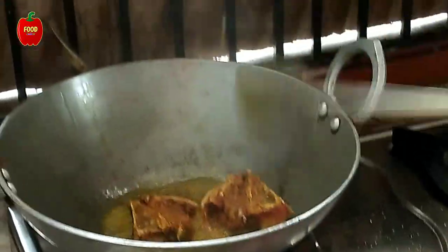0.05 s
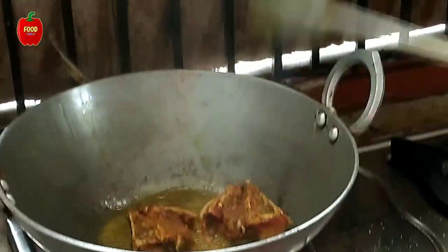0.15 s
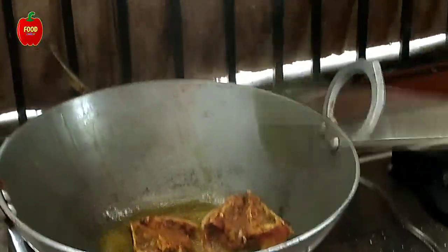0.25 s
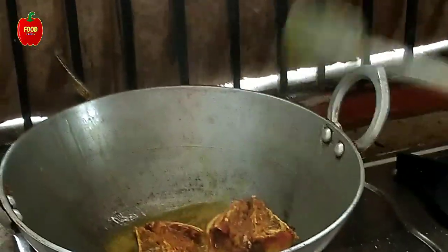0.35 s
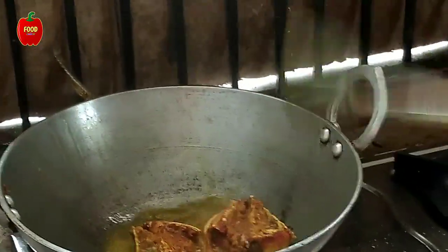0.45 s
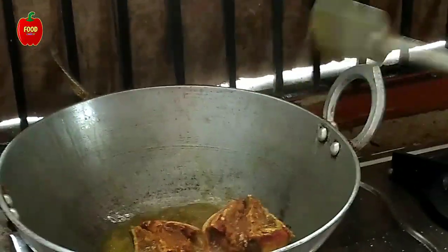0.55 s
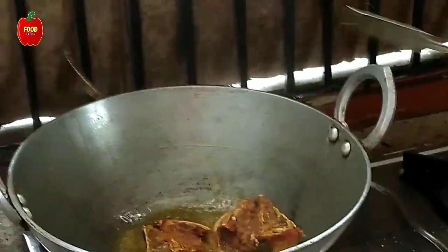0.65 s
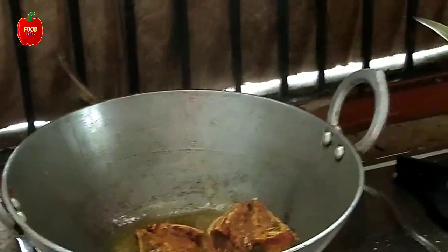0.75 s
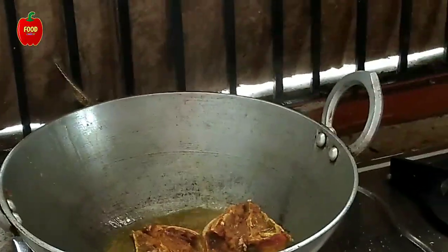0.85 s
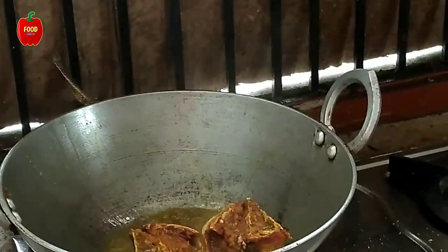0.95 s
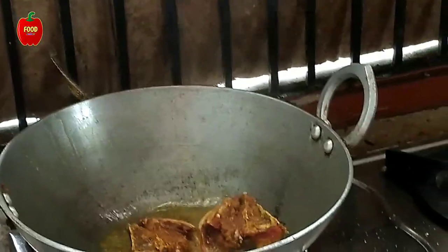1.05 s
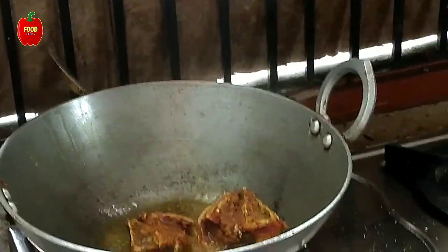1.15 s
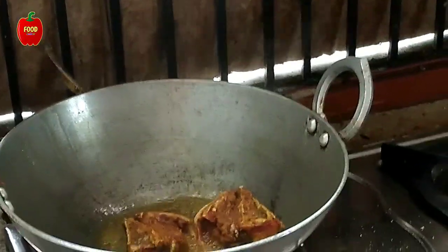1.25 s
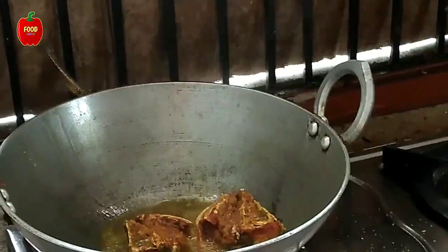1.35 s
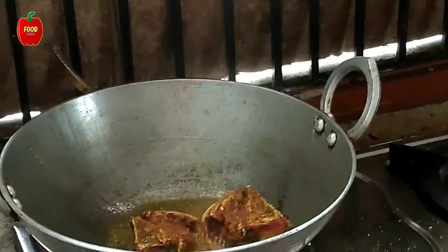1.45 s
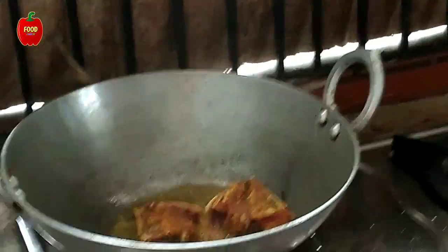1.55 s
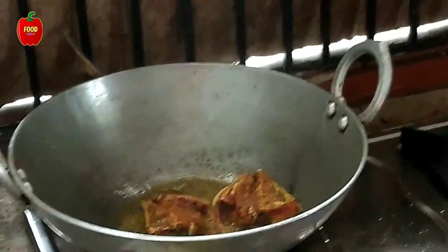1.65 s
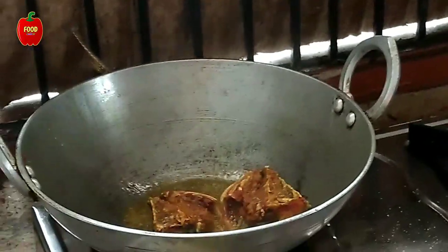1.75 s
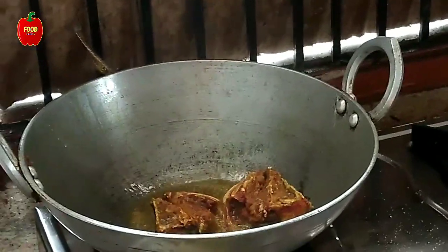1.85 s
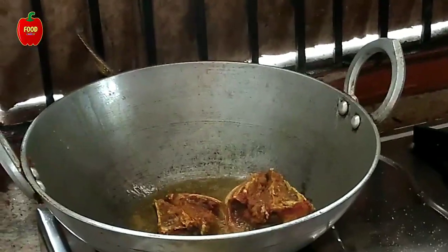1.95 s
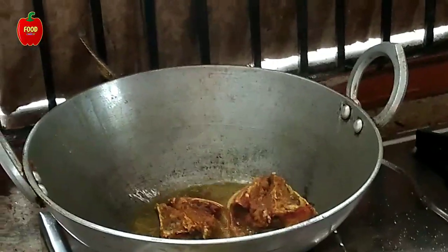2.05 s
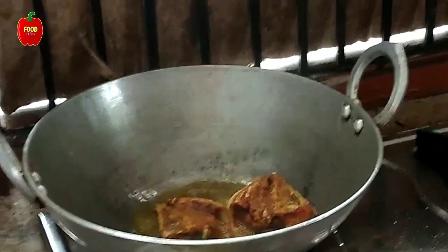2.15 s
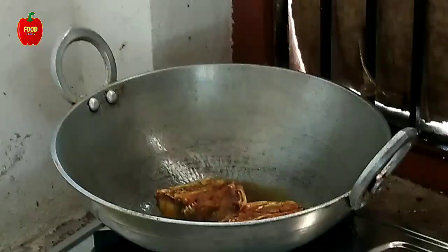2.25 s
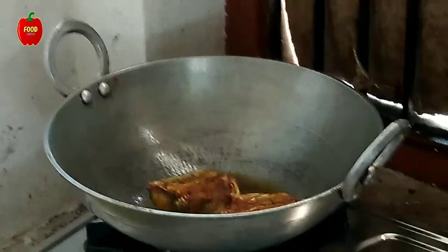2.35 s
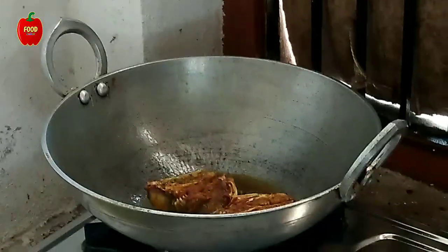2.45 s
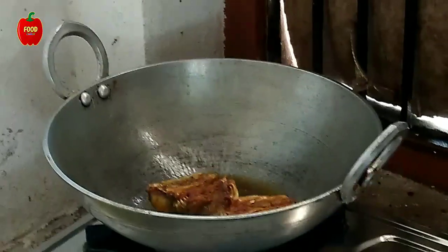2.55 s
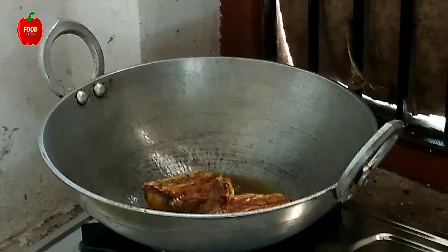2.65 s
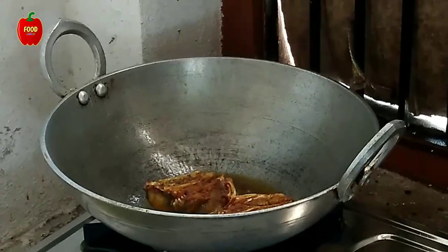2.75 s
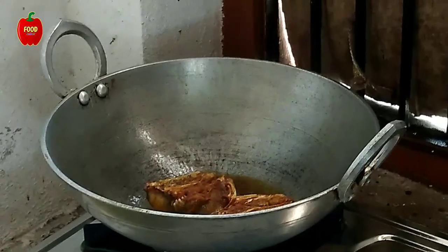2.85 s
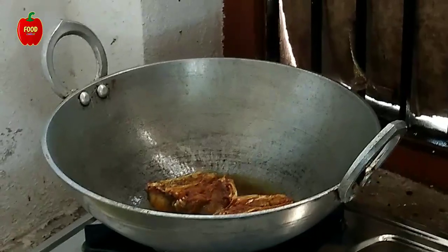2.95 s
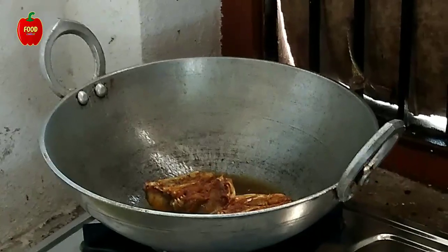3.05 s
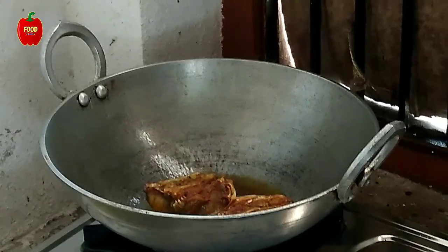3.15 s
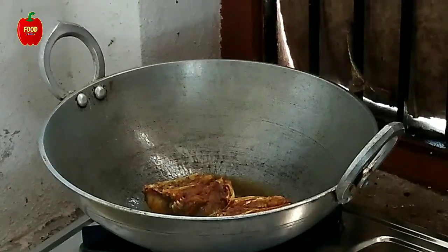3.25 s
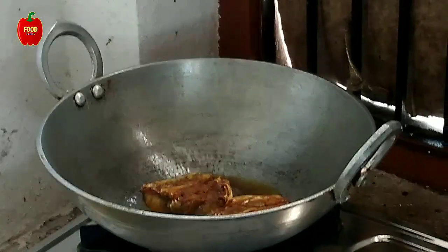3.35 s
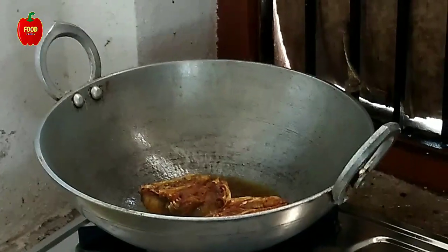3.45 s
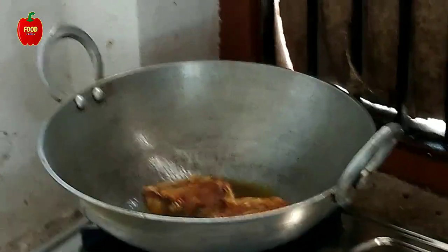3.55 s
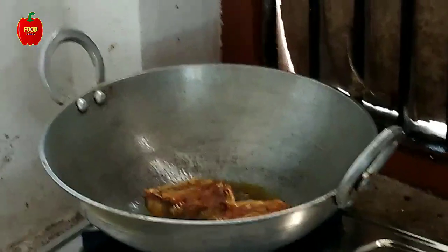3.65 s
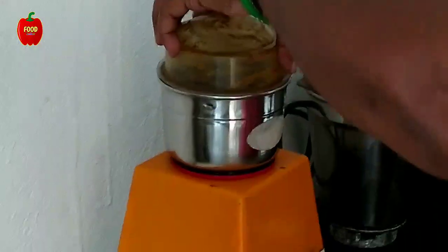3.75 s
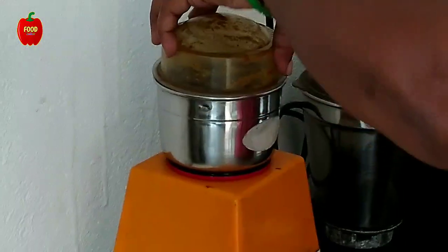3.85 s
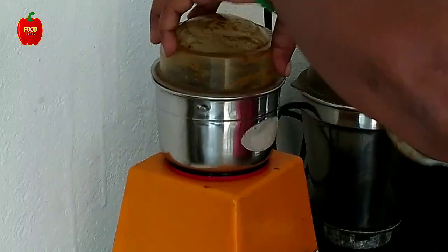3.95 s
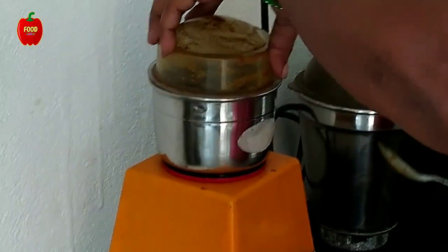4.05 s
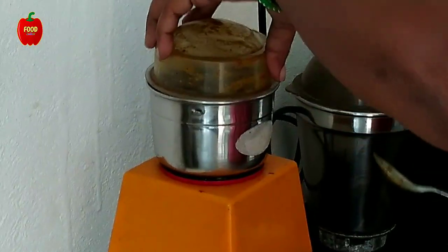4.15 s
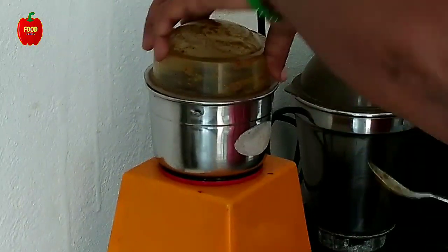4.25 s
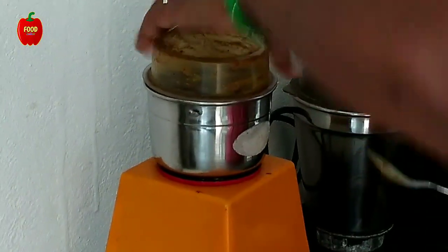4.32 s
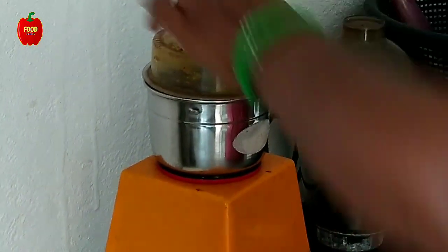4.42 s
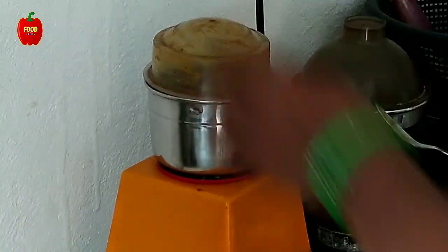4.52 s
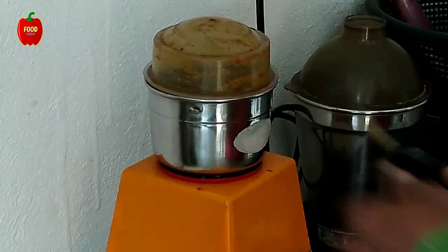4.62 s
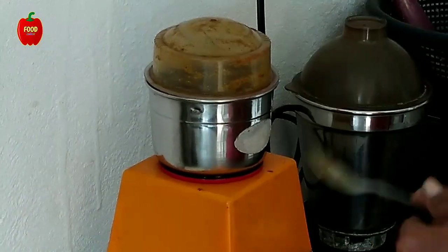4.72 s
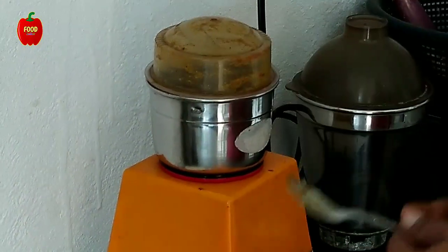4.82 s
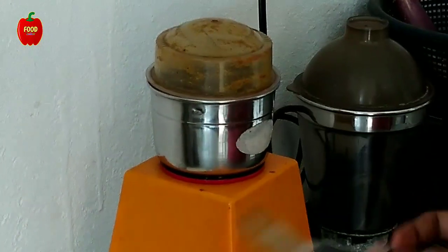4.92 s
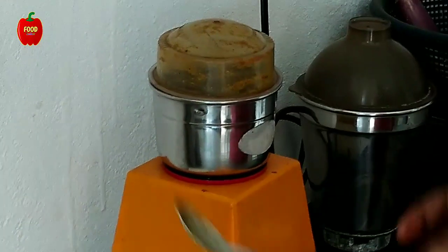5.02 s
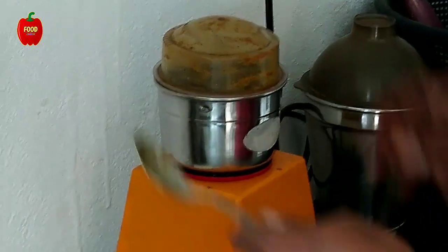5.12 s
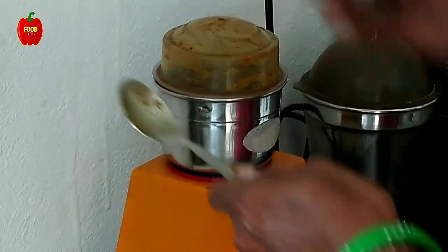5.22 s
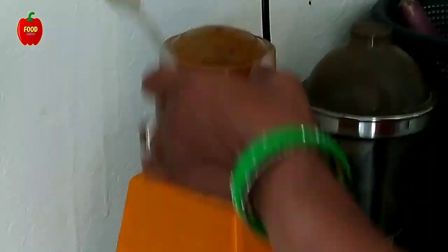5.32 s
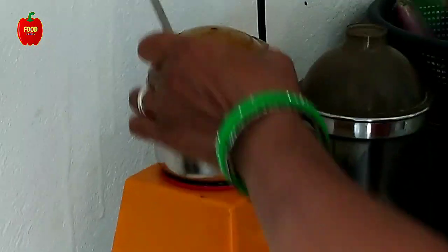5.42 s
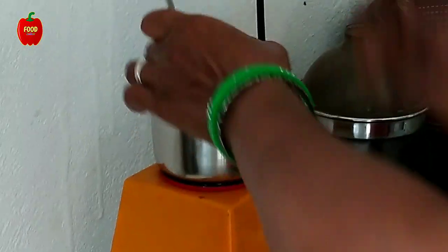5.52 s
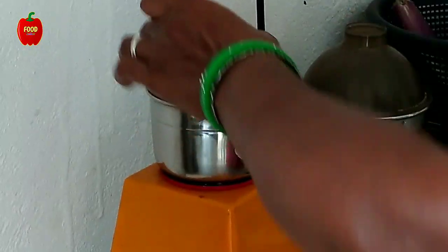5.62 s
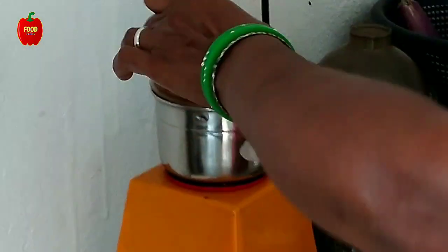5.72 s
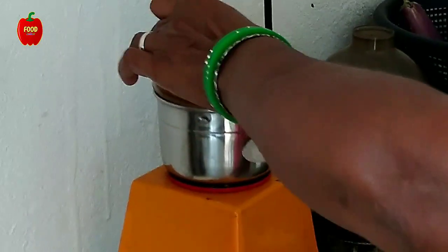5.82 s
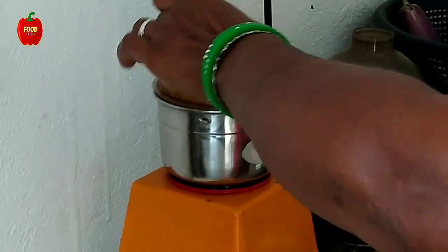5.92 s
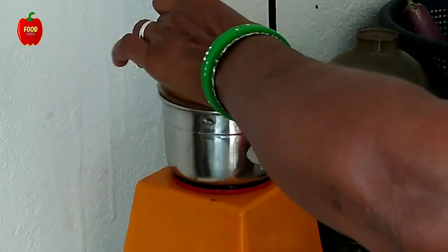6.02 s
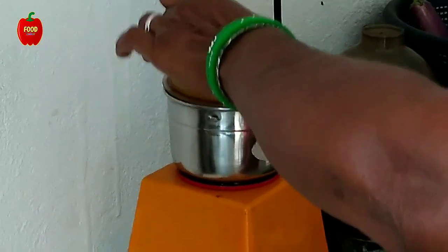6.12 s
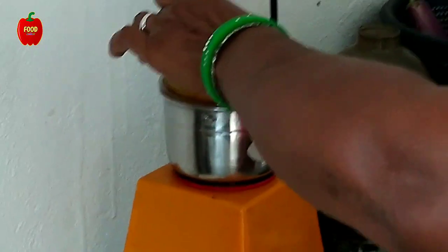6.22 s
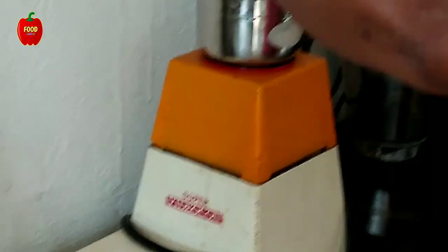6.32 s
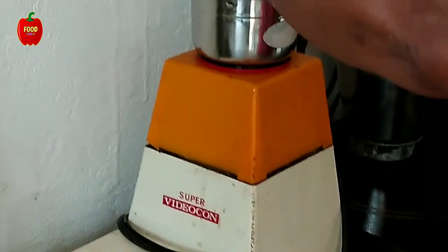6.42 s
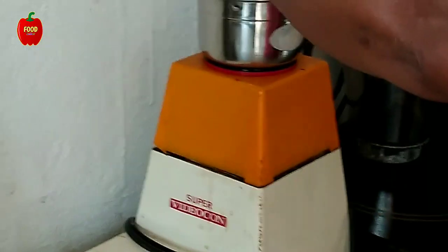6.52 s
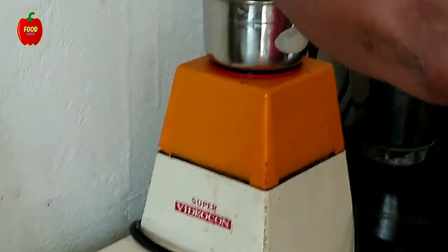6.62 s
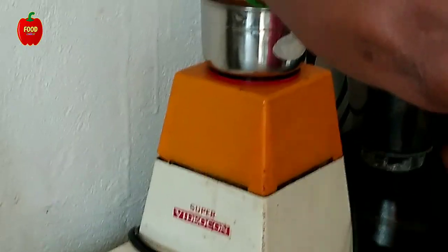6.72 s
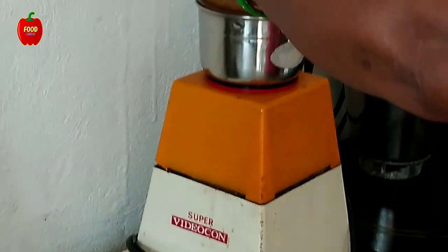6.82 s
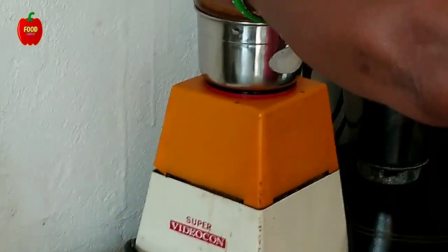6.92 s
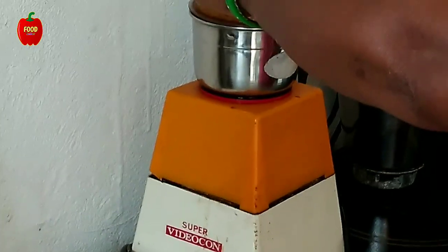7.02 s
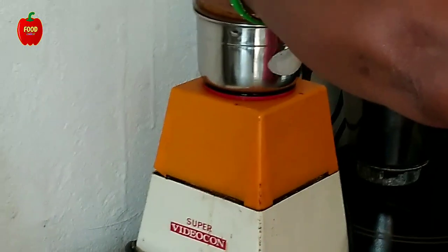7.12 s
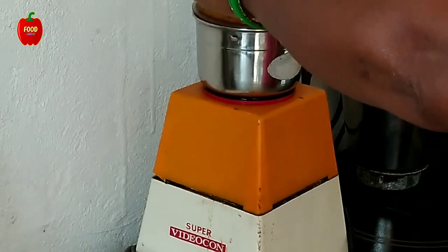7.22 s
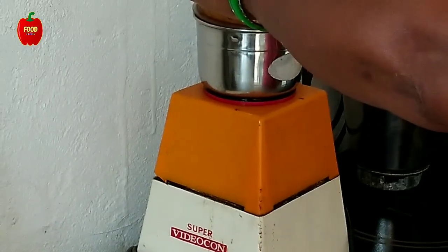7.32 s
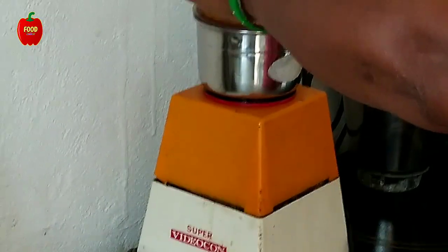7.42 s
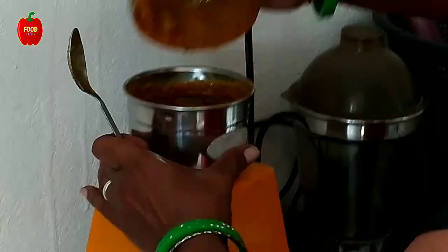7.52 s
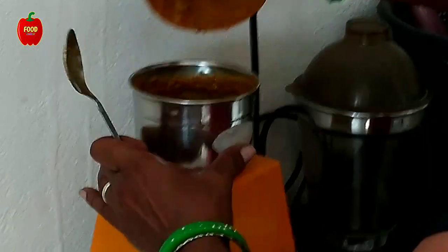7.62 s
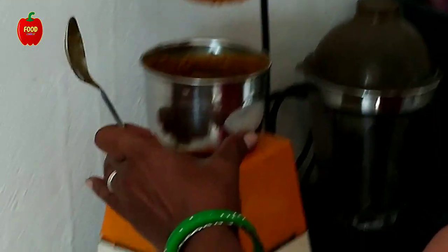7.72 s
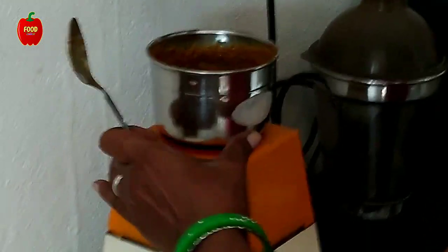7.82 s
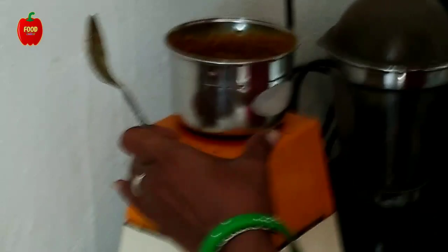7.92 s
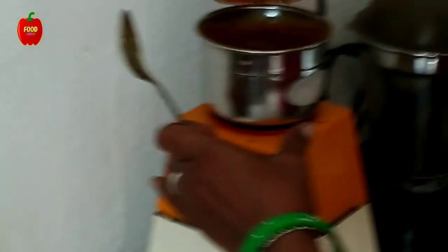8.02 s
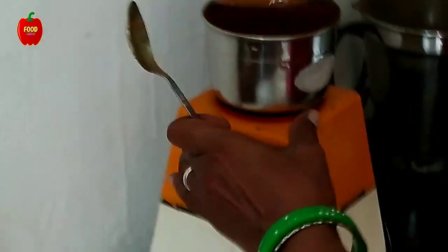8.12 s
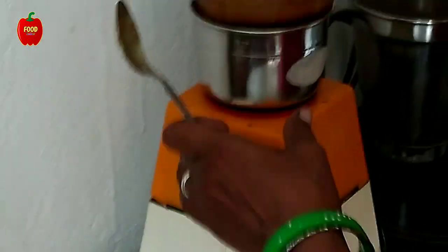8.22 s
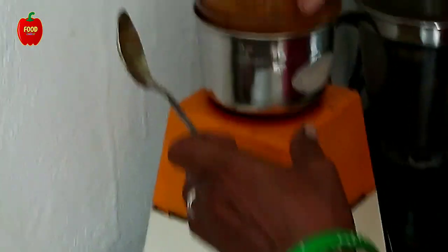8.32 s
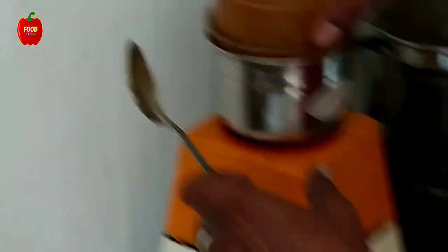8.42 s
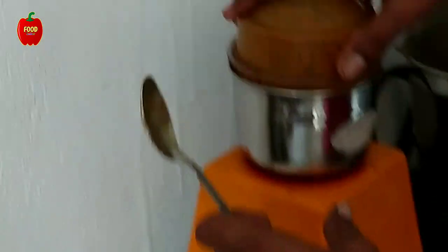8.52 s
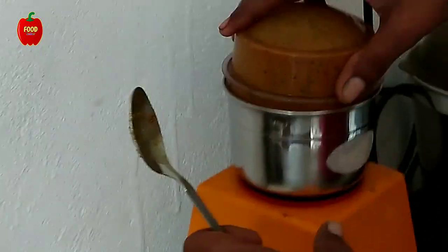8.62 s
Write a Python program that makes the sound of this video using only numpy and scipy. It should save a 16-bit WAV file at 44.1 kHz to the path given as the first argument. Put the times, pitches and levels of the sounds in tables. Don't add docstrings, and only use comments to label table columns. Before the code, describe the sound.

In a small kitchen, close stereo frying opens with dense bright sizzling, spitting oil and a strong spatula knock at 0.2 seconds, followed by lighter taps and short scrapes. More metal knocks cluster around 1.3 to 1.5, and sharp spits around 1.9. At 2.1 the microphone shifts beside the pan; the sizzle is somewhat quieter, with scattered taps, pops and scrapes until 3.5. It then jumps to a grinder, leaving soft distant frying, a faint low hum and small handling clicks. Around 5.15 the grinder starts abruptly: a high whine climbs over loud harsh hammering and jar rattle, with catches growing denser near 6. Switched off just before 6.1, the whine vanishes and clattering throbs slow and weaken, fading by 7.3. Faint frying continues to 8.5, with light bumps and thin utensil scrapes near 8 and after 8.2.

```python
import sys
import numpy as np
from scipy import signal
from scipy.fft import rfft, irfft, next_fast_len
from scipy.io import wavfile
from scipy.ndimage import uniform_filter1d

SR = 44100
rng = np.random.default_rng(int(sys.argv[2]) if len(sys.argv) > 2 else 0)


def amplitude_ratio(level_db):
    exponent = np.asarray(level_db, float) / 20
    return 10 ** exponent


def generate_wav(signal):
    frames = np.transpose(np.atleast_2d(signal))
    scaled = np.clip(frames, -1, 1) * 32767
    pcm = np.round(scaled).astype(np.int16)
    wavfile.write(sys.argv[1], SR, pcm)


N = 382347

CHANGES_S = [
    2.125,
    3.56,
    6.09,
]
PLACES = [0, 1, 2, 2]

# time in seconds, level in dB.
FRY_S_DB = [(0, -23), (.06, -21.5), (.9, -23), (1.62, -24.5), (1.8, -26), (1.97, -23.5), (2.12, -27),
            (2.16, -28.5), (2.5, -29.5), (2.62, -28), (3.54, -26.5), (3.575, -37), (4.2, -34.5), (4.5, -34),
            (5.1, -36), (7.4, -36.5), (7.55, -37), (8.2, -35.5), (8.5, -35.5)]
# frequency in Hz, density in dB per Hz.
FRY_COLOUR_HZ_DB = [
    [(24, -69), (40, -60), (85, -33), (130, -21.5), (188, -26), (217, -23), (271, -29), (382, -29.5),
     (625, -16.5), (779, -19.5), (1630, -16), (2660, -6.5), (4240, -6.5), (5030, -14), (8630, -1),
     (14100, -17)],
    [(24, -75), (40, -20), (118, -27), (192, -17.5), (422, -22.5), (465, -14.5), (513, -21), (595, -11),
     (1440, -13), (2530, -1.5), (3230, -5), (4560, -3.5), (5030, -10.5), (8020, 0), (14100, -14)],
    [(24, -68), (40, -48), (86, -8.5), (136, -11.5), (179, -8), (364, -13), (422, -15.5), (1150, -11.5),
     (2180, -3), (2660, -8.5), (4450, -8), (5970, -11), (7270, -7), (9760, -4), (14100, -15)],
]
# frequency in Hz, left minus right in dB.
FRY_BALANCE_HZ_DB = [
    [(60, 9.0), (110, 13), (200, 18), (380, 6.5), (690, 0), (1270, -0.5), (2350, 1), (4330, -2.5),
     (7980, -2), (14700, 9)],
    [(60, 13), (110, 9.5), (200, 17), (380, 7), (690, 0.5), (1270, -0.5), (2350, -1), (4330, -3.5),
     (7980, -2), (14700, 17)],
    [(60, 13), (110, 13), (200, 20), (380, 9.5), (690, -0.5), (1270, 3), (2350, 11.5), (4330, 0),
     (7980, 6.5), (14700, 15)],
]
# frequency in Hz, left-right correlation (-1 to 1).
FRY_ALIKE_HZ = [(60, 0.86), (180, 0.48), (540, 0.89), (1630, 0.03), (4890, 0.025), (14700, 0.03)]
# centre in Hz, width in Hz, gain in dB.
FRY_PEAKS_HZ_DB = [
    [(620, 60, 5.5), (11150, 1900, -3)],
    [(630, 150, 2.5), (10200, 1000, -2.5)],
    [(2300, 510, 0.5), (4470, 270, 2), (7320, 750, 6.5), (8200, 800, -1.5), (9040, 990, 4),
     (10100, 600, 3.5), (11400, 700, -3.5), (1500, 890, -9), (290, 94, -4.5)],
    [(2120, 220, 4.5), (2400, 200, 3), (4560, 400, 2), (5700, 500, 1), (7780, 700, 4), (8850, 900, 2.5),
     (9850, 600, -3), (11800, 900, -2.5), (1500, 1450, -9), (180, 27, -11.5)],
]
PAN_DRONE_DB = [-44.5, -47.5, -57.5, -54.5]
# time in seconds, peak in dB.
SPITS_S_DB = [(0.034, -17.5), (0.7607, -29), (1.906, -14), (1.952, -18), (2.54, -27), (2.808, -25),
              (2.921, -14.5), (3.928, -35), (4.161, -28), (4.473, -30)]
# time in seconds, level in dB, t60 in seconds.
RUSTLES_S_DB = [
    (3.56, -54.5, 7.7),
    (7.3, -69, 8.9),
]
DRONE_SHARE = .3
SHAKEN_OIL_DB, SHAKEN_OIL_T60_S = -23, .4

# time in seconds, peak in dB, left minus right in dB.
KNOCKS_S_DB = [(0.205, -9.5, 15), (0.226, -17.5, 3), (0.247, -17.5, 3), (0.265, -21, 6),
               (0.311, -21.5, -1.5), (0.391, -22.5, 2), (0.629, -22, 3), (0.69, -27, 3), (0.925, -28.5, 10),
               (1.318, -16, 3), (1.353, -18, 5), (1.378, -26, 0), (1.425, -24, 3), (1.462, -25, 0),
               (1.934, -27.5, -1), (2.098, -30, -1), (2.741, -28, 3), (2.92, -27, 0.0), (2.948, -22.5, 3),
               (3.358, -26.5, 5)]
# frequency in Hz, level in dB, t60 in seconds.
PAN_MODES_HZ_DB_S = [(143, -16, 0.059), (289, -4.5, 0.015), (432, -10, 0.11), (551, -5, 0.12),
                     (611, -8, 0.16), (653, -5, 0.11), (760, -0.5, 0.036), (930, -1.5, 0.02),
                     (1160, -12, 0.018), (1490, 0, 0.014), (2060, -1, 0.0083)]
SOFT_LOSS_DB_PER_DB, SOFT_BELOW_HZ = 0.48, 480
# time in seconds, peak in dB,
# frequency in Hz, t60 in seconds.
BUMPS_S_DB_HZ = [(0.314, -28, 1500, .02), (.631, -28, 870, 0.018), (1.324, -39, 182, .2),
                 (1.33, -42, 345, 0.26), (1.349, -47, 141, .1), (2.744, -32, 730, 0.025),
                 (3.357, -32, 720, .02), (6.334, -25, 400, 0.056), (6.44, -23.5, 435, 0.093),
                 (1.36, -40, 415, .15), (1.428, -32, 1010, 0.018), (1.938, -33, 1200, .015),
                 (2.102, -31, 1300, .015), (6.222, -23, 905, .06), (6.45, -24, 820, 0.075),
                 (6.536, -25, 1380, .06), (6.545, -22, 960, .04), (6.682, -24, 806, 0.046),
                 (6.862, -29, 636, 0.054), (5.6, -24, 980, 0.12), (4.036, -30, 6470, .015),
                 (4.197, -30.5, 4430, 0.02), (5.14, -27.5, 3500, .03), (3.698, -61, 285, 0.082),
                 (3.88, -52, 358, 0.13), (4.229, -52, 620, 0.052), (5.158, -14.5, 455, 0.095),
                 (5.195, -16, 454.6, 0.22), (5.24, -17, 1274, 0.086), (5.28, -16.5, 987, 0.1),
                 (5.3, -16.5, 990, 0.094), (6.02, -38, 55, 0.044), (6.066, -30, 85, 0.018),
                 (6.097, -20, 350, 0.1), (6.66, -27, 560, .06), (7.128, -36.5, 225, 0.13),
                 (8.049, -44, 299, 0.068), (8.157, -43.5, 367, 0.08), (8.176, -43, 350, .06),
                 (5.283, -18, 810, 0.089), (5.7, -19.5, 926, 0.13), (6.232, -22, 345, .04),
                 (6.409, -19.5, 325, 0.078), (6.484, -29, 332, 0.048), (6.525, -21, 314, 0.082),
                 (6.755, -22, 1370, .03), (8.57, -43, 447, .05), (8.26, -48, 163, 0.078),
                 (8.55, -46, 288, 0.072), (8.578, -48, 231, 0.074)]
# start in seconds, length in seconds, level in dB, frequency in Hz, t60 in seconds.
SCRAPES_S_DB_HZ = [(0.39, .04, -36, 3190, .004), (0.38, 0.05, -33.5, 2400, 0.005),
                   (.385, .04, -36, 3100, .003), (2.08, .04, -32, 2700, 0.0035),
                   (3.19, 0.016, -34, 1900, 0.012), (3.395, 0.024, -33, 2600, 0.0055),
                   (1.7, 0.11, -32.5, 3100, 0.0054), (1.6, 0.06, -40, 3400, 0.0059),
                   (7.951, 0.054, -52, 2180, .02), (8.25, 0.053, -44, 2200, .025),
                   (8.24, 0.045, -50, 2420, .025), (8.455, 0.042, -44, 2100, 0.028),
                   (8.3, 0.038, -40.5, 3800, 0.0043), (3.2, 0.034, -34, 2650, .006),
                   (2.0, 0.075, -32.5, 3160, 0.0045), (8.435, .05, -43, 2470, 0.031),
                   (8.525, .03, -47, 2300, .025)]

OFF_S, STOP_S, MAINS_HZ = 6.075, 7.5, 49.7
# time in seconds, speed in turns per second.
SHAFT_S_HZ = [(5.17, 182), (5.25, 190), (5.3, 196.5), (5.36, 208), (5.43, 216.5), (5.51, 223.7),
              (5.63, 231.7), (5.85, 240.3), (6.07, 245)]
# frequency in Hz, level in dB.
SLOT_BODY_HZ_DB = [(2160, -41), (2215, -31), (2250, -17), (2290, -15.5), (2360, -27), (2500, -24),
                   (2560, -25), (2595, -17), (2630, -11.5), (2660, -14.5), (2700, -36), (2785, -18.5),
                   (2820, -28), (2850, -34), (2890, -26), (2920, -28), (2940, -53)]
# frequency in Hz, level in dB.
SHAKE_BODY_HZ_DB = [(180, -35), (189, -33), (196, -45), (222, -39), (232, -34.5), (238, -26), (246, -29.5)]
# multiple of twice the mains, level in dB, loss in dB per second.
SIDE_LINES_DB = [
    (1, -1.5, 8),
    (-1, -3, 3.5),
    (-2, -17, 4),
]
SHAFT_ORDERS = [2, 6, 8, 9, 10, 14]
# centre in Hz, width in Hz, gain in dB.
ORDER_PEAKS_HZ_DB = [(416, 32, 15), (456.3, 28, 18.5), (484.5, 11, 15), (1410, 70, 12), (1960, 55, 15),
                     (2100, 90, 7), (2260, 95, 15), (2430, 60, 11), (3282, 70, 17), (3390, 43, 14)]

# time in seconds, level in dB.
LOAD_S_DB = [(5.13, -66), (5.137, -25.5), (5.21, -21.5), (6.07, -21), (6.66, -24), (6.87, -28),
             (7.0, -35.5), (7.2, -44), (7.29, -50)]
# frequency in Hz, density in dB per Hz.
RUN_COLOUR_HZ_DB = [(29, -69), (50, -39), (112, -30), (170, -16), (240, -4.5), (530, -3.5), (611, -6),
                    (687, -7), (979, -3.5), (1100, -7), (2030, -3.5), (4650, -15.5), (4990, -22),
                    (7280, -15), (10400, -20), (14100, -27.5)]
# frequency in Hz, density in dB per Hz.
COAST_COLOUR_HZ_DB = [(29, -72), (50, -64), (140, -19), (215, -3), (338, -4.5), (687, -8.5), (810, -4),
                      (1080, -10.5), (1330, -8), (1680, -6), (1990, 2.5), (2770, -12), (4540, -23.5),
                      (4990, -29.5), (8390, -20.5), (14100, -34)]
# frequency in Hz, left minus right in dB.
RUN_BALANCE_HZ_DB = [(60, 8), (110, 5), (200, 15), (380, 7), (690, -6), (1270, -4.5), (2350, 6),
                     (4330, -3.5), (7980, -0.5), (14700, 7)]
# frequency in Hz, left minus right in dB.
COAST_BALANCE_HZ_DB = [(60, 13), (110, 18), (200, 21), (380, 11), (690, -1.5), (1270, 1.5), (2350, 14),
                       (4330, 0), (7980, 2.5), (14700, 27)]
# frequency in Hz, left-right correlation (-1 to 1).
GRINDER_ALIKE_HZ = [(60, 0.3), (150, 1), (380, 0.87), (940, 0.76), (2350, 0.0029), (5880, 0.07),
                    (14700, -0.092)]
# centre in Hz, width in Hz, gain in dB.
RUN_PEAKS_HZ_DB = [(297, 100, 0), (446, 36, 3.5), (620, 28, 9.5), (725, 90, 1.5), (970, 45, 3),
                   (1130, 150, -4), (1300, 32, 6.5), (2030, 480, 5.5), (2300, 120, 4)]
# centre in Hz, width in Hz, gain in dB.
COAST_PEAKS_HZ_DB = [(289, 22, 8.1), (348, 56, 5.5), (455, 10, 11), (820, 40, 1.6), (1374, 82, 4.1),
                     (2180, 340, 2.6), (2340, 220, 3.9)]
# level in dB relative to a load of -22 dB, share of the load swing, gain in dB per
RUN_BANDS_DB = [
    (2, 0.85, -4.5),
    (0, 1.34, 2),
    (-8, 0.76, 4.5),
]
# level in dB relative to a load of -22 dB, share of the load swing, gain in dB per
COAST_BANDS_DB = [
    (-1.5, 1.1, 3.5),
    (3, 0.97, -2),
    (-7, 0.55, -5.5),
]
# time in seconds, housing gain in dB, jar gain in dB.
SURGES_S_DB = [(5.165, -2, -1.5), (5.218, 0, 0), (5.262, -6, 5), (5.295, 2.5, 4), (5.325, -2.5, -6),
               (5.36, 2.5, 5.5), (5.738, 1.5, 0), (5.9, -1.5, -3), (6.05, 4, 1), (6.125, 4, 4.5),
               (6.234, 1, -2), (6.484, 4.5, 1), (7.135, 7, 3)]
# time in seconds, loss in dB, slackening in seconds.
SLACKS_S_DB = [(6.09, 1.5, .02), (6.15, 2, .012), (6.19, 5, 0.1), (6.258, 2.5, .015), (6.31, 6.5, 0.028),
               (6.419, 5, 0.053), (6.52, 7.5, 0.033), (6.622, 10, 0.033), (6.74, 7, 0.043),
               (6.852, 13, 0.054), (6.897, 1.5, 0.011), (7.045, -0.5, 0.011), (7.11, -1, 0.02)]
# time in seconds, peak in dB.
CATCHES_S_DB = [(5.1393, -26), (5.2056, -9), (5.5395, -7), (5.7778, -19), (5.8267, -5), (5.889, -1),
                (5.919, -14), (5.9854, 1), (6.003, -1), (6.0228, 3), (6.041, -9), (6.0714, -3),
                (6.1018, -11), (6.1272, -5), (6.213, -11), (6.2634, -7), (6.278, -11), (6.2909, -13),
                (6.3208, -6), (6.329, -6), (6.3901, -6), (6.426, -18), (6.434, -10), (6.466, -10),
                (6.4764, -7), (6.482, -8), (6.5303, -5), (6.541, -14), (6.5607, 0.5), (6.6256, -9),
                (6.632, -15), (6.645, -11), (6.653, -15), (6.66, -2), (6.678, -8), (6.7428, -8),
                (6.757, -10), (6.7987, -16), (6.866, -5.5), (6.903, -11), (6.9124, -7.5), (6.9543, -25),
                (6.9868, -22), (7.0002, -19), (7.0551, -25), (7.0975, -24), (7.1225, -22)]
SURGE_S, CATCH_T60_S, TAKE_UP_S = 0.0093, 0.0068, 0.0036
HISS_SLACK_SHARE, STOP_FADE_S = 0.72, 0.023
CHANGE_OVER_S = 0.033

# frequency in Hz, level in dB.
HUM_HZ_DB = [(96.9, -71), (140.0, -65)]
KITCHEN_T60_S = 0.18
# frequency in Hz, gain in dB.
SHARED_COLOUR_HZ_DB = [(3800, -0.5), (4720, 1.5), (4800, 4.5), (4890, -8.5), (5050, 1.5), (5700, -0.5)]
RIPPLE_DB, RIPPLE_HZ = 3.5, 22.4
LEFT_LAG_S = .00007


def frying():
    t = np.arange(N) / SR
    sizzle_db, = in_time(FRY_S_DB)
    pops = grains(next_fast_len(N), 20000, spread_db=2.0, patchy_db=0.96, fast_hz=22.0)

    knock_s, knock_db, _ = np.transpose(KNOCKS_S_DB)
    shaken = strikes(knock_s + 0.0023, knock_db + SHAKEN_OIL_DB)
    shaken = signal.lfilter([1], [1, -amplitude_ratio(-60 / (SHAKEN_OIL_T60_S * SR))], shaken + 1e-18)
    for s, db, t60 in RUSTLES_S_DB:
        shaken += (t > s) * amplitude_ratio(db - 60 * np.abs(t - s) / t60)

    edges = [0, *(int(s * SR) for s in CHANGES_S), N]
    out = np.zeros((2, N))
    for a, b, place, peaks, db in zip(edges, edges[1:], PLACES, FRY_PEAKS_HZ_DB, PAN_DRONE_DB):
        bubbles = heard(pops[:, a:b], FRY_COLOUR_HZ_DB[place], FRY_ALIKE_HZ, FRY_BALANCE_HZ_DB[place], peaks)
        body, sizzle = split(bubbles, 1310)
        here_db = sizzle_db[a:b]
        drone = amplitude_ratio(db + DRONE_SHARE * (here_db - here_db.mean()))
        out[:, a:b] = body * np.hypot(drone, shaken[a:b]) + sizzle * amplitude_ratio(here_db)

    spits = strikes(*np.transpose(SPITS_S_DB))
    snap = ring(spits, 2900, 0.0077) + ring(spits, 7300, 0.012)
    return out + amplitude_ratio(-2.0) * snap * [[1], [.6]]


def knocks():
    s, db, side_db = np.transpose(KNOCKS_S_DB)
    luck_db = rng.normal(0, 2.1, (len(s), len(PAN_MODES_HZ_DB_S)))
    pan = np.zeros(N)
    for k, (hz, top_db, t60) in enumerate(PAN_MODES_HZ_DB_S):
        soft_db = (hz < SOFT_BELOW_HZ) * SOFT_LOSS_DB_PER_DB * (db + 18)
        blows = strikes(s + 0.00294, db + top_db - 10.5 + luck_db[:, k] + soft_db)
        pan += ring(blows, hz, t60) * (-1) ** k

    bumps = np.zeros(N)
    for bump_s, bump_db, hz, t60 in BUMPS_S_DB_HZ:
        push = ring(strikes([bump_s], bump_db + 0.5) * 6 * hz / SR, hz, 3.0 / hz)
        bumps += ring(push, hz, t60)

    side = amplitude_ratio(in_time(list(zip(s, side_db)))[0] / 2)
    return pan * [side, 1 / side] + bumps * amplitude_ratio([[3], [-5]]), pan + bumps


def scrapes():
    out = np.zeros((2, N))
    grit = rng.standard_normal((2, N)) * rng.exponential(1, N) ** 1.6
    for s, length_s, db, hz, t60 in SCRAPES_S_DB_HZ:
        a, b = int(s * SR), int((s + length_s) * SR)
        stroke = rms_one(ring(grit[:, a:b], hz, t60) + .5 * ring(grit[:, a:b], 2.1 * hz, 0.002))
        swell = np.sin(np.linspace(0, 1, b - a) ** 0.83 * np.pi)
        out[:, a:b] += amplitude_ratio(db) * stroke * swell
    return signal.sosfilt(signal.butter(4, 900, "high", fs=SR, output="sos"), out)


def whine():
    t = np.arange(N) / SR
    on_s = SHAFT_S_HZ[0][0]
    turns_hz, = in_time(SHAFT_S_HZ)
    powered = np.clip((t - on_s) / 0.038, 0, 1) * np.clip((OFF_S - t) / 0.026, 0, 1)
    phase = 2 * np.pi * np.cumsum(turns_hz * (1 + .0015 * drift(40))) / SR

    slots = amplitude_ratio(at_hz(SLOT_BODY_HZ_DB, 12 * turns_hz) + 1.5 * drift(30)) * np.sin(12 * phase)
    for k, db, loss_db_per_s in SIDE_LINES_DB:
        line_db = at_hz(SLOT_BODY_HZ_DB, 12 * turns_hz + k * 2 * MAINS_HZ) + db
        line_db = line_db - loss_db_per_s * np.clip(t - on_s, 0, 1)
        slots += amplitude_ratio(line_db + 1.5 * drift(30)) * np.sin(12 * phase + k * 4 * np.pi * MAINS_HZ * t)

    orders = np.zeros(N)
    for k in SHAFT_ORDERS:
        order_db = resonances(ORDER_PEAKS_HZ_DB, k * turns_hz) - 44.5 + 2.1 * drift(17)
        orders += amplitude_ratio(order_db) * np.sin(k * phase)

    shake = amplitude_ratio(at_hz(SHAKE_BODY_HZ_DB, turns_hz) - 1.0) * np.sin(phase)
    mono = powered * (slots + orders)
    return mono * amplitude_ratio([[1.5], [-1.5]]) + powered * shake * amplitude_ratio([[4], [-7]]), mono


def rattle():
    on, off, stop = int(LOAD_S_DB[0][0] * SR), int(OFF_S * SR), int(STOP_S * SR)
    fade = np.zeros(N)
    fade[on:stop] = np.clip(1 - (np.arange(on, stop) / SR - LOAD_S_DB[-1][0]) / STOP_FADE_S, 0, 1)

    pops = grains(next_fast_len(stop - on), 9000, spread_db=2.5, patchy_db=1.0, fast_hz=72)[:, :stop - on]
    backward = pops[::-1, ::-1]
    run = heard(pops, RUN_COLOUR_HZ_DB, GRINDER_ALIKE_HZ, RUN_BALANCE_HZ_DB, RUN_PEAKS_HZ_DB)
    coast = heard(backward, COAST_COLOUR_HZ_DB, GRINDER_ALIKE_HZ, COAST_BALANCE_HZ_DB, COAST_PEAKS_HZ_DB)

    powered = np.exp(-np.clip(np.arange(on, stop) - off, 0, None) / (CHANGE_OVER_S * SR))
    coasting = np.sqrt(1 - powered ** 2)
    out = np.zeros((2, N))
    for start, part, bands, share in [(on, run, RUN_BANDS_DB, powered), (off, coast, COAST_BANDS_DB, coasting)]:
        levels_db = hammering(bands, start / SR)
        for band, db in zip(split(part, 1330, 3190), levels_db):
            out[:, on:stop] += share * band * amplitude_ratio(db[on:stop])

    catch_s, catch_db = np.transpose(CATCHES_S_DB)
    grating = signal.lfilter([1], [1, -amplitude_ratio(-60 / (CATCH_T60_S * SR))], strikes(catch_s, catch_db - 9))
    grating = grating * rng.standard_normal(N) * 0.24
    jar = ring(grating, 1984, 0.029) - ring(grating, 2210, 0.014)
    return out * fade + jar * amplitude_ratio([[3], [-3]])


def hammering(bands, start_s):
    now = np.arange(N) / SR
    t = now[::40]
    load_db, = in_time(LOAD_S_DB)
    slack, housing, jar = np.zeros((3, len(t)))
    for s, db, fall_s in SLACKS_S_DB:
        slack += db * np.exp(np.where(t < s, (t - s) / fall_s, (s - t) / TAKE_UP_S))
    for s, housing_db, jar_db in SURGES_S_DB:
        surge = np.exp(-((t - s) / SURGE_S) ** 2 / 2)
        housing += housing_db * surge
        jar += jar_db * surge

    levels_db = []
    for (db, share, db_per_s), jolt in zip(bands, [housing - slack, jar - slack, -HISS_SLACK_SHARE * slack]):
        steady_db = db - 22 + share * (load_db + 22) + db_per_s * (now - start_s)
        levels_db.append(steady_db + np.interp(now, t, jolt))
    return levels_db


def hum():
    t = np.arange(N) / SR
    lines = sum(amplitude_ratio(db + 5.5 + 1.5 * drift(5.5)) * np.sin(2 * np.pi * hz * t) for hz, db in HUM_HZ_DB)
    return lines * (t > CHANGES_S[1]) * np.where(t > OFF_S, .3, 1) * amplitude_ratio([[4.5], [-9]])


def kitchen(x):
    size = next_fast_len(N + SR)
    w = 2 * np.pi * np.arange(size // 2 + 1) / size
    out = np.zeros((2, len(w)), complex)
    for k, lag in enumerate(rng.uniform(.008, .03, 12) * SR):
        loop = amplitude_ratio(-60 * lag / SR / KITCHEN_T60_S) * np.exp(-1j * w * lag) / (1 + w * 0.5)
        out[k % 2] += loop / (1 - loop) * (-1) ** (k // 2)
    out *= w ** 2 / (w ** 2 + (2 * np.pi * 350 / SR) ** 2)
    return irfft(out * rfft(x, size), size)[:, :N]


def heard(pair, colour, alike, balance, peaks):
    length = pair.shape[1]
    size = next_fast_len(length)
    hz = np.arange(size // 2 + 1) * SR / size
    ripple = uniform_filter1d(rng.standard_normal(len(hz)), int(RIPPLE_HZ * size / SR) + 1)
    db = at_hz(colour, hz) + at_hz(SHARED_COLOUR_HZ_DB, hz) + resonances(peaks, hz)
    db += RIPPLE_DB * rms_one(ripple) / (1 + hz / 2500)

    c = np.clip(at_hz(alike, hz), -.99, .99)
    left = amplitude_ratio(at_hz(balance, hz) / 2)
    right = 1 / left
    lag = 2 * np.pi * hz * LEFT_LAG_S
    mid, side = rfft(pair, size) * [np.sqrt(1 + c), np.sqrt(1 - c)]
    even = amplitude_ratio(db) / np.sqrt(left ** 2 + right ** 2 + 2 * c * left * right * np.cos(lag))
    ports = np.array([left * np.exp(-1j * lag) * (mid + side), right * (mid - side)])
    return irfft(ports * even, size)[:, :length]


def grains(size, per_s, spread_db, patchy_db, fast_hz):
    sizes = amplitude_ratio(spread_db * np.minimum(rng.exponential(1, (2, size)), 5)) * rng.choice([-1, 1], (2, size))
    pops = rfft(sizes * (rng.random((2, size)) < per_s / SR))
    together = drift(fast_hz / 3)
    out = 0
    for share in octave_shares(size, np.geomspace(150, 13000, 10)):
        flicker = amplitude_ratio(patchy_db * (.5 * together + drift(fast_hz)))[:size]
        out = out + irfft(pops * share, size)[:, :N] * flicker
    return out


def ring(clicks, hz, t60):
    r, w = amplitude_ratio(-60 / (t60 * SR)), 2 * np.pi * hz / SR
    return signal.lfilter([0, np.sin(w)], [1, -2 * r * np.cos(w), r * r], clicks + 1e-18)


def strikes(times_s, db):
    clicks = np.zeros(N)
    clicks[(np.asarray(times_s) * SR).astype(int)] = amplitude_ratio(db)
    return clicks


def drift(rate_hz):
    r = np.exp(-80 * np.pi * rate_hz / SR)
    slow = signal.lfilter([1], [1, -2 * r, r * r], rng.standard_normal(N // 40 + 2002))[2000:]
    return np.interp(np.arange(N) / 40, np.arange(len(slow)), rms_one(slow))


def split(x, *edges_hz):
    length = x.shape[1]
    size = next_fast_len(length)
    shares = octave_shares(size, np.outer(edges_hz, [.92, 1.08]).ravel())
    middle = [a + b for a, b in zip(shares[1:-1:2], shares[2::2])]
    spectrum = rfft(x, size)
    return [rms_one(irfft(spectrum * part, size)[:, :length]) for part in [shares[0], *middle, shares[-1]]]


def octave_shares(size, centres_hz):
    hz = np.log(np.arange(size // 2 + 1) * SR / size + 1)
    return [np.interp(hz, np.log(centres_hz), row) for row in np.eye(len(centres_hz))]


def resonances(peaks, hz):
    return sum(top_db / (1 + (2 * (hz - f) / width) ** 2) for f, width, top_db in peaks)


def at_hz(points, hz):
    points = np.array(points, float)
    return np.interp(np.log(hz + 1), np.log(points[:, 0] + 1), points[:, 1])


def in_time(rows):
    s, *columns = np.transpose(rows)
    return [np.interp(np.arange(N) / SR, s, column) for column in columns]


def rms_one(x):
    return x / np.sqrt(np.mean(np.mean(np.atleast_2d(x), axis=0) ** 2) + 1e-20)


def scene():
    blows, blows_mono = knocks()
    song, song_mono = whine()
    room = kitchen(amplitude_ratio(-8.0) * blows_mono + amplitude_ratio(-5.0) * song_mono)
    return frying() + blows + scrapes() + song + rattle() + hum() + room


def roll_off(x):
    return signal.sosfilt(signal.butter(12, 15300, fs=SR, output="sos"), x)


def record(dry):
    thin = signal.sosfilt(signal.butter(2, 80, "high", fs=SR, output="sos"), dry)
    rumble_band = signal.butter(2, [35, 80], "band", fs=SR, output="sos")
    rumble = signal.sosfilt(rumble_band, rng.standard_normal((2, N)))
    rounded = np.tanh(thin + amplitude_ratio(-82.0) * rms_one(rumble * [[1], [.4]]))
    mix = signal.sosfilt(signal.ellip(12, .5, 75, 14230, fs=SR, output="sos"), rounded)
    return roll_off(mix)


dry = scene()
out = record(dry)
generate_wav(out)
```